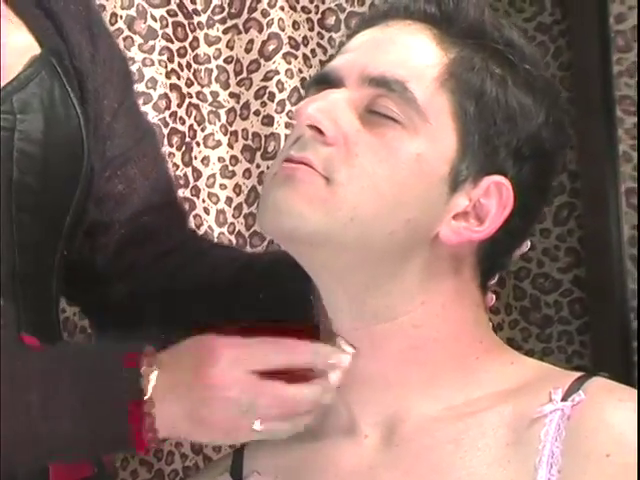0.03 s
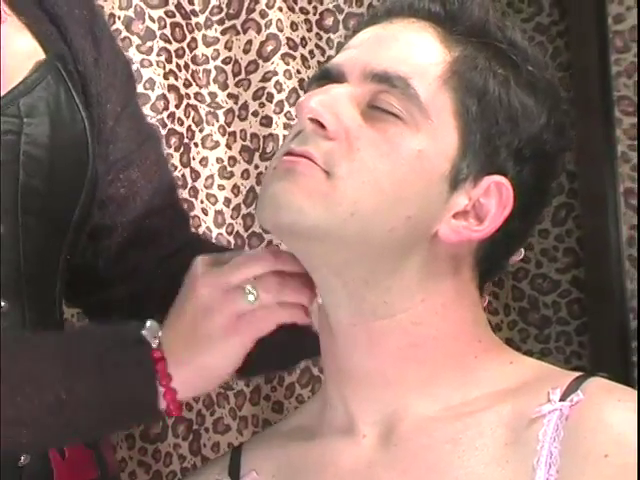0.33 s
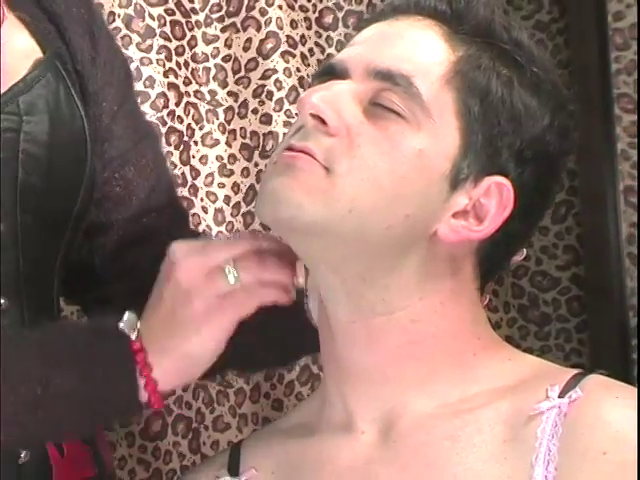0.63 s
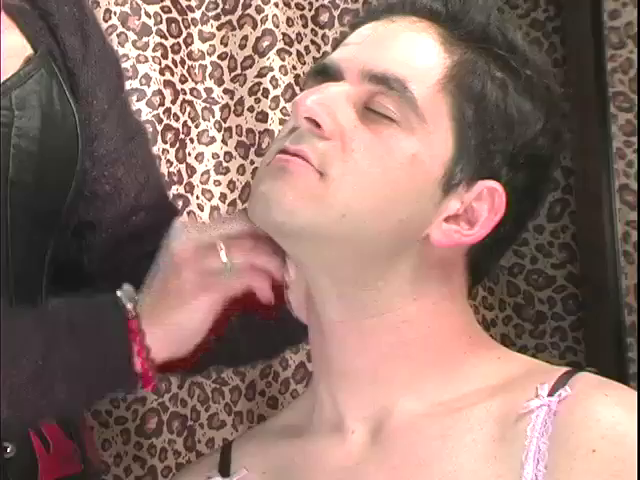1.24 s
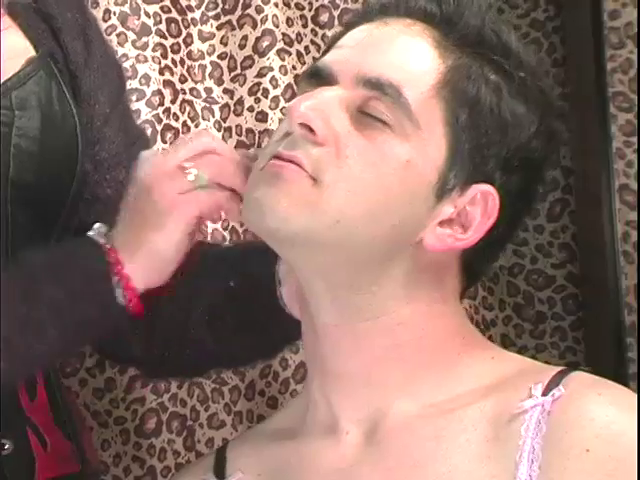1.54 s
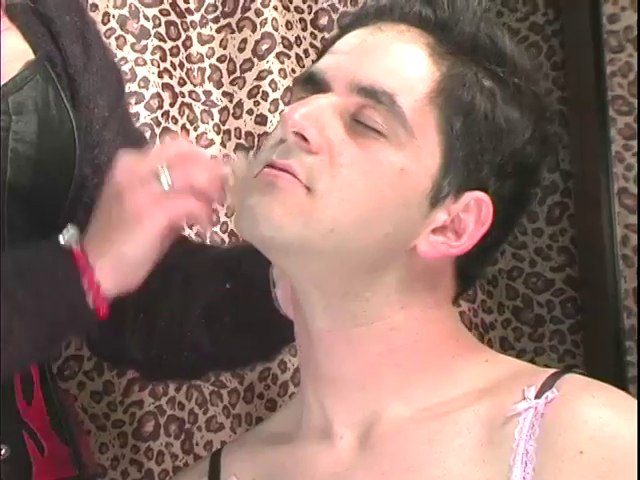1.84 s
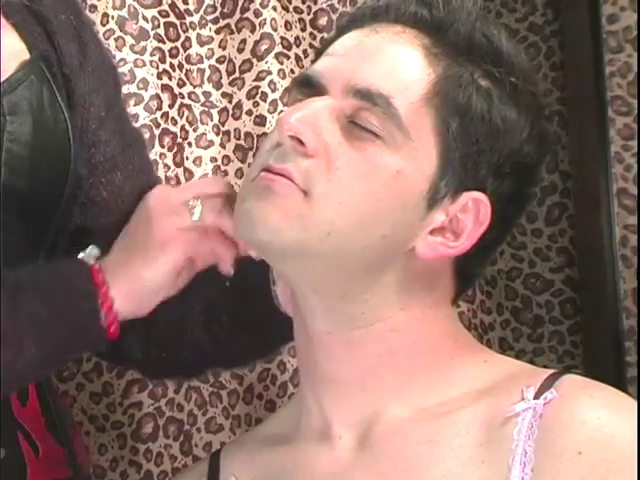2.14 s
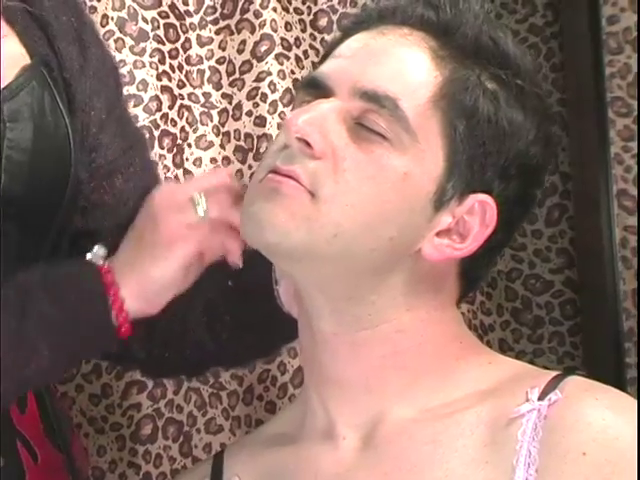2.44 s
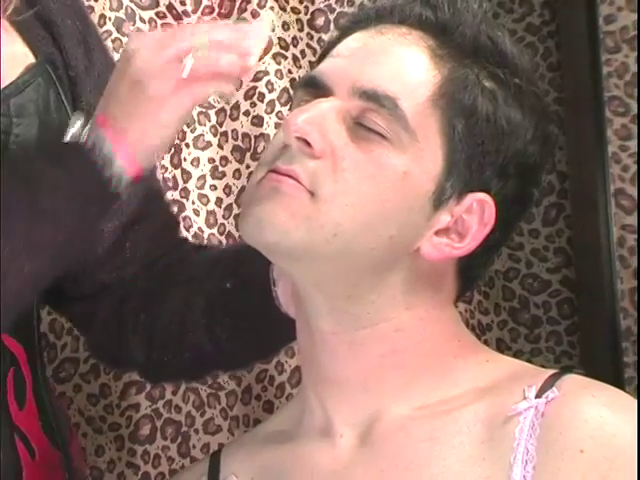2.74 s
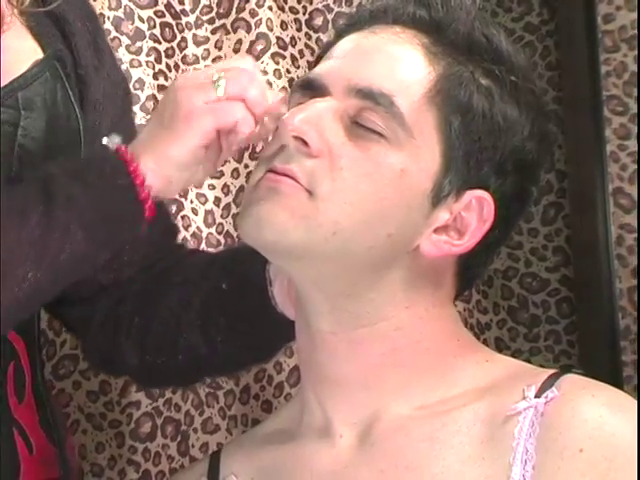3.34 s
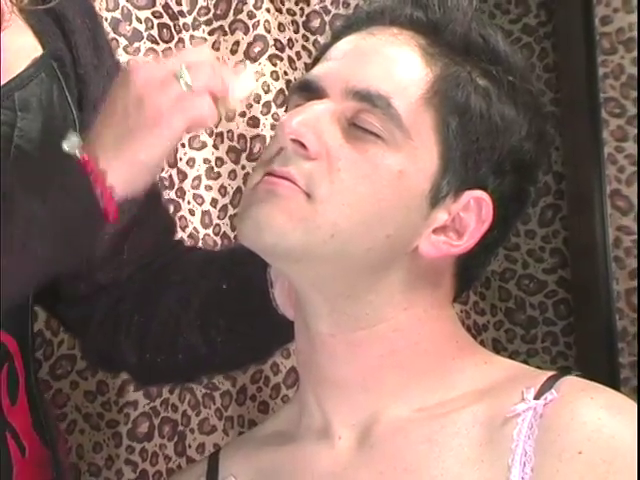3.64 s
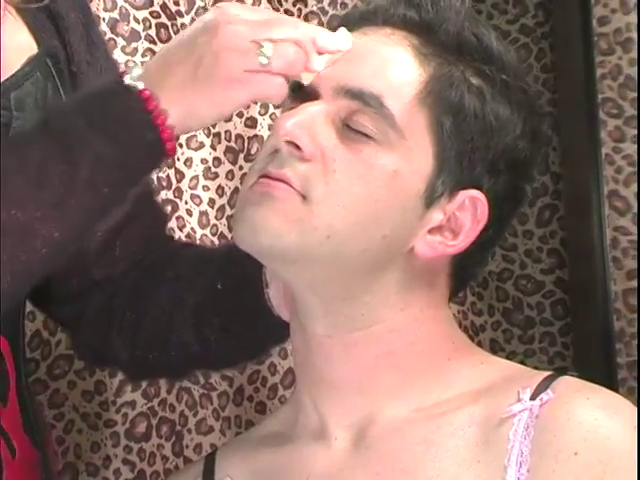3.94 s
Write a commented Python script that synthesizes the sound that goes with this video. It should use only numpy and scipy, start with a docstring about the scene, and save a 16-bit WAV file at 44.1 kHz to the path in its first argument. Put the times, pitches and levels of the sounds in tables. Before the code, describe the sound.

A make-up pad brushes skin very faintly, pauses, then wipes and dabs busily from about 0.9 seconds, strongest near 1.7. A sleeve rustles dully now and then from 1.4 seconds. After 3.1 seconds come three soft, slow wipes. Throughout, a louder low fan and motor hum swells and ebbs in the small room, peaking at 1.6 seconds, with camera hiss, a faint throbbing whir and a thin high whine.

```python
"""A small room hums from the start: fan, motors and a bass drone that swells and ebbs. A tape camera
adds hiss, a throbbing whir and a thin beating whine, and notches out the tones of its own drum.
A make-up pad brushes a neck and face, a faint stream of tiny slips, pauses, then wipes and dabs busily
from about 0.9 s. From 1.4 s a sleeve rustles as the arm moves; the drone peaks at 1.6 s, just before
the strongest dabs. After 3.1 s the pad eases into three soft, slow wipes."""
import sys
import numpy as np
from scipy import signal
from scipy.fft import rfft, irfft
from scipy.io import wavfile
from scipy.ndimage import uniform_filter1d

SR = 44100
rng = np.random.default_rng(int(sys.argv[2]) if len(sys.argv) > 2 else 0)


def persist_wave(psi):
    """Save psi, clipped to +-1, as 16-bit WAV."""
    counts = np.round(np.clip(psi, -1, 1) * 32767).astype(np.int16)
    wavfile.write(sys.argv[1], SR, np.atleast_2d(counts).T)


N = 176400


def undb(db):
    """Decibels to gain."""
    return 10 ** (np.asarray(db) / 20)


def unit(x):
    """Scale to rms 1."""
    return x / np.sqrt(np.mean(x ** 2))


def tone(phase, db):
    """A sine at an rms level in dB."""
    return np.sqrt(2) * undb(db) * np.sin(phase)


def freqs():
    """Frequency of each spectral bin, at least 1 Hz."""
    return np.maximum(np.arange(N // 2 + 1) * SR / N, 1)


def colour(x, curve, tilt_db=0, pivot_hz=3500):
    """Shape x with an EQ curve and a tilt per octave; rms 1."""
    hz, db = np.array(curve, float).T
    eq_db = np.interp(np.log(freqs()), np.log(hz), db) + tilt_db * np.log2(freqs() / pivot_hz)
    return unit(irfft(rfft(x) * undb(eq_db), N))


def wander(per_s):
    """Smooth random modulation: levels held 1 / per_s seconds and slewed twice; rms 1."""
    hold = max(int(SR / per_s), 1)
    steps = np.repeat(rng.standard_normal(N)[:N // hold + 1], hold)
    return unit(uniform_filter1d(uniform_filter1d(steps, hold), hold)[:N])


def hum(hz, harmonics, drift=0.00053):
    """Harmonics of one slightly wandering machine speed."""
    turns = np.cumsum(hz * (1 + drift * wander(2.05))) / SR
    return sum(tone(2 * np.pi * (k * turns + rng.random()), db) for k, db in harmonics)


def ringing(resonances):
    """Noise ringing in narrow bands."""
    rings = np.zeros(N)
    for hz, half_width, db in resonances:
        band = rfft(rng.standard_normal(N)) / (1 + ((freqs() - hz) / half_width) ** 2)
        rings += undb(db) * unit(irfft(band, N))
    return rings


# Room tone EQ. Each row: frequency in Hz, relative level in dB.
AIR_EQ = [(8, -18), (15, -17), (30, 0.5), (48, -8.5), (72, -3), (100, -5), (125, -10), (148, -21),
          (215, -16.5), (255, -21), (290, -22.5), (400, -22.5), (500, -30), (760, -28.5), (1050, -31),
          (1400, -34.5), (2400, -41.5), (6000, -52.5), (15000, -60)]
def air(level_db=-51.5):
    """Moving air lays down a low, even rush."""
    return undb(level_db) * colour(rng.standard_normal(N), AIR_EQ)


# Hiss EQ. Each row: frequency in Hz, relative level in dB.
HISS_EQ, HISS_DB = [(100, 1.1), (2000, 0.83), (5000, 1.1), (8000, -0.17), (15500, -1.1)], -66.5
def microphone_hiss():
    """The microphone's steady, nearly white noise floor."""
    return undb(HISS_DB) * colour(rng.standard_normal(N), HISS_EQ)


# Tones of the whir. Each row: pitch in Hz, level in dB.
WHIR_TONES = [(677, -76.5), (724, -73.5), (755, -82)]
def tape_drive(t, throbs_per_s=11.99, throb_db=6, limp_db=1.2, sway_hz=5.8, wobble_rad=0.97):
    """The drive's whir throbs evenly; every second throb is stronger, and the pitch sways with it."""
    angle = 2 * np.pi * throbs_per_s * (t - .008)
    throb = unit(undb(throb_db * np.cos(angle) - limp_db * np.cos(angle / 2)))
    sway = np.cumsum(-sway_hz * np.cos(angle / 2)) / SR
    return throb * sum(tone(2 * np.pi * (hz * t + sway) + wobble_rad * wander(2 * throbs_per_s), db)
                       for hz, db in WHIR_TONES)


def camera_whine(t):
    """Two thin, very high tones beat 13 times a second."""
    return tone(2 * np.pi * 15734.3 * t, db=-69.5) + tone(2 * np.pi * 15747.3 * t, db=-74)


def drum_notches(x, drum_hz=299.7, feedback=.78, depth=0.92):
    """The camera's comb filter dips at every multiple of its drum tone."""
    delay = np.exp(-2j * np.pi * freqs() / drum_hz)
    comb = (1 - feedback) * (1 + delay) / 2 / (1 - feedback * delay)
    comb *= freqs() > drum_hz / 2  # let the bass through
    return irfft(rfft(x) * (1 - depth * comb), N)


FAN_HZ, MOTOR_HZ, PUMP_HZ, BLOWER_HZ, MAINS_HZ = 19.49, 25.42, 58.3, 58.85, 60
# The fan's blade tone. Each row: multiple of the fan speed, level in dB before the swell.
BLADE_TONE = [(4, -46.5)]
# Rumble under it. Each row: centre in Hz, half width in Hz, level in dB before the swell.
RUMBLE_BAND = [(75, 2.5, -59)]
# Fader ride on both. Each row: time in seconds, gain in dB.
DRONE_SWELL = [(0, 0.5), (.5, 1.5), (.76, -7), (1.08, 1.5), (1.33, -2.5), (1.52, -5), (1.61, 7), (1.7, 5.5),
               (1.8, -4.5), (2.12, 3.5), (2.28, -4), (2.68, -2), (2.95, 3), (3.42, 1), (3.6, -5), (3.88, 2),
               (4, 0.5)]
def drone(t):
    """The fan's blade tone and the rumble just below it swell and ebb together."""
    bass = hum(FAN_HZ, BLADE_TONE) + ringing(RUMBLE_BAND)
    times, gains_db = np.array(DRONE_SWELL).T
    return bass * undb(np.interp(t, times, gains_db))


# The hum of each machine. Each row: multiple of its base rate, level in dB.
FAN_HUM = [(2, -62), (5, -50.5), (6, -54), (7, -67.5)]
MOTOR_HUM = [(1, -51.5), (2, -60.5), (13, -75)]
PUMP_HUM = [(1, -50), (4, -79.5)]
BLOWER_HUM = [(2, -56.5), (3, -69), (4, -72.5)]
MAINS_HUM = [(2, -59.5), (4, -76), (6, -81.5)]
# Lone tones in the hum. Each row: pitch in Hz, level in dB.
LONE_TONES = [(106.4, -65), (220.5, -71)]
# Resonances in the machine noise. Each row: centre in Hz, half width in Hz, level in dB.
MACHINE_RINGS = [(207.8, 2.9, -72), (233.7, 2.9, -74.5), (254.3, 3.1, -77), (533.3, 11.4, -77),
                 (958.5, 6, -79.5), (1952, 5.6, -85.5)]
def machines(t):
    """Fan, motors and mains beat against each other; their noise rings in narrow bands."""
    motors = hum(MOTOR_HZ, MOTOR_HUM) + hum(PUMP_HZ, PUMP_HUM) + hum(BLOWER_HZ, BLOWER_HUM)
    lone_tones = sum(hum(hz, [(1, db)]) for hz, db in LONE_TONES)
    fan = drone(t) + hum(FAN_HZ, FAN_HUM)
    return fan + motors + lone_tones + hum(MAINS_HZ, MAINS_HUM) + ringing(MACHINE_RINGS)


def room(x, t, t60_s=0.24, wet_db=-10):
    """A curtained room adds a short, soft tail."""
    tail = rng.standard_normal(N) * np.exp(-np.log(1000) * t / t60_s)
    tail /= np.sqrt(np.sum(tail ** 2))
    return x + undb(wet_db) * signal.fftconvolve(x, tail)[:N]


def stroke(t, peak, rise, fall):
    """Speed of a hand stroke: a bell with its own rise and fall."""
    return np.exp(-((t - peak) / np.where(t < peak, rise, fall)) ** 2 / 2)


def friction(slips_per_s=5000, scatter_db=2, fibre_db=2.5, drag_db=1.0):
    """Tiny slips of scattered size over smooth fibre noise; uneven drag roughens the level."""
    slips = (rng.random(N) < slips_per_s / SR) * rng.standard_normal(N)
    slips *= undb(scatter_db * np.minimum(rng.exponential(size=N), 5))
    fibres = undb(fibre_db) * rng.standard_normal(N)
    return (unit(slips) + fibres) * undb(drag_db * wander(per_s=110))


# Cloth EQ. Each row: frequency in Hz, relative level in dB.
CLOTH_EQ = [(150, -23), (480, 1), (850, -1), (1400, -8), (2200, -20.5), (6000, -38)]
# Sleeve moves, plus one soft pad dab at 3.067 s with the same dull colour. Each row: peak time in seconds, half
# length in seconds, level in dB.
RUSTLES = [(1.436, 0.018, -61.5), (1.53, 0.023, -65.5), (1.843, 0.027, -70), (2.37, 0.022, -70),
           (2.584, 0.039, -65), (2.733, 0.034, -62), (3.067, 0.015, -61), (3.342, .04, -71.5),
           (3.652, 0.049, -66.5)]
def sleeve(t):
    """Cloth rubs with a dull rustle as the arm shifts; a soft dab at 3.07 s has the same dull colour."""
    envelope = sum(undb(db) * stroke(t, peak, half, half) for peak, half, db in RUSTLES)
    return envelope * colour(friction(), CLOTH_EQ)


# EQ of pad on skin. Each row: frequency in Hz, relative level in dB.
PAD_EQ = [(300, -17.5), (800, -1), (1500, 1), (2300, -2.5), (3100, 0), (4100, -5.5), (5000, -4),
          (6000, -2.3), (7000, -6.5), (11000, -10.5), (15500, -21)]
# Wipes and dabs. Each row: peak time, rise and fall in seconds, level in dB, tilt in dB per octave.
WIPES = [(0.029, 0.023, .04, -68, -1), (.21, 0.055, 0.06, -68, -1), (.272, .01, 0.013, -64.5, -0.5),
         (.86, 0.033, 0.038, -66.5, 0.5), (1.14, 0.064, 0.041, -67.5, -2), (1.29, 0.042, 0.065, -64, 0),
         (1.445, 0.025, 0.028, -62.5, -.2), (1.51, 0.029, 0.037, -68, -1), (1.68, 0.042, 0.05, -67, -1.5),
         (1.738, 0.012, 0.018, -58.5, -0.7), (1.762, 0.011, 0.018, -59, -3.5), (1.9, .04, 0.035, -69.5, 1),
         (2.03, .02, 0.024, -68.5, 1), (2.14, 0.018, .02, -73, 3), (2.26, 0.04, 0.045, -67.5, -2.5),
         (2.4, 0.039, .05, -73, -2), (2.58, 0.012, 0.015, -66, 4), (2.65, 0.064, 0.054, -64.5, -2),
         (2.705, 0.03, 0.04, -63, 0.5), (2.722, .012, 0.012, -71, -3.5), (2.83, 0.085, 0.065, -67.5, 1.5),
         (2.965, 0.042, 0.049, -64.5, 0), (3.055, .008, .016, -67.5, 3), (3.36, 0.069, 0.11, -72, -3),
         (3.66, .07, 0.098, -70, -1), (3.98, 0.047, .05, -70, -3.5)]
def pad(t):
    """The pad rubs skin: each wipe swells with the speed of the hand and has its own brightness."""
    return sum(undb(db) * stroke(t, peak, rise, fall) * colour(friction(), PAD_EQ, tilt)
               for peak, rise, fall, db, tilt in WIPES)


def scene():
    """Pad and sleeve in the room, over a bed of machines and air; mono."""
    t = np.arange(N) / SR
    foley = room(pad(t) + sleeve(t), t)
    return (foley + machines(t) + air())[None]


def record(dry):
    """The camera adds whir and hiss, notches out its drum tones, whines and cuts the top."""
    t = np.arange(N) / SR
    notched = drum_notches(dry + tape_drive(t) + microphone_hiss())
    high_cut = signal.ellip(12, .1, 80, 15850, fs=SR, output="sos")
    return signal.sosfilt(high_cut, notched + camera_whine(t))


dry = scene()
out = record(dry)
persist_wave(out)
```